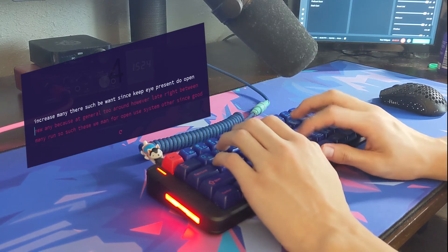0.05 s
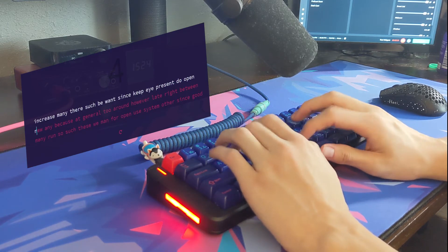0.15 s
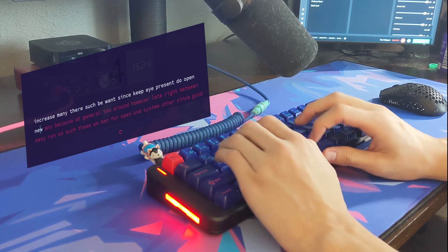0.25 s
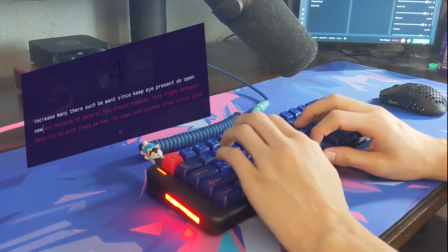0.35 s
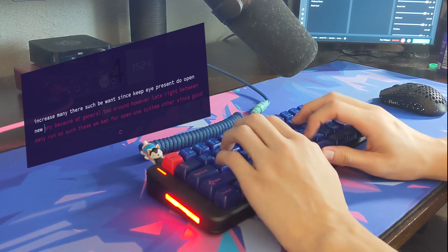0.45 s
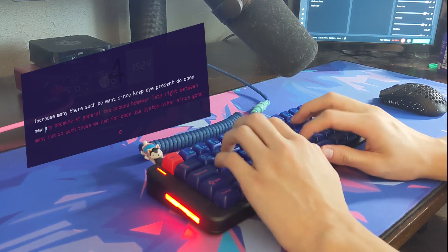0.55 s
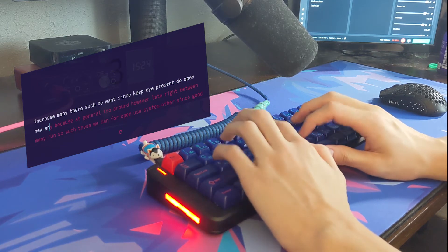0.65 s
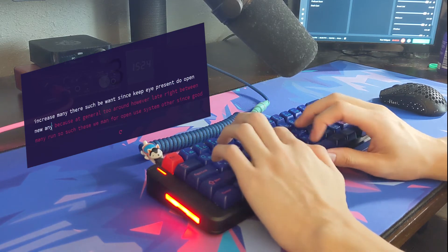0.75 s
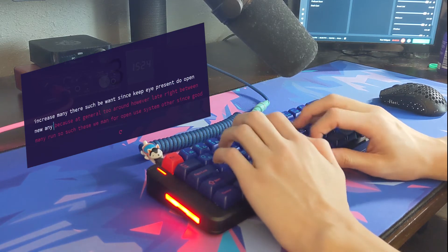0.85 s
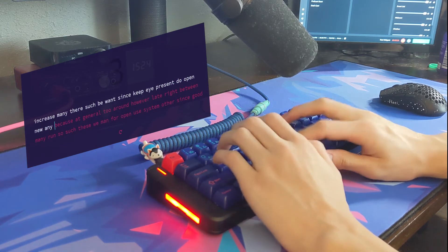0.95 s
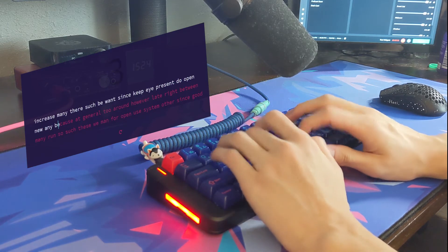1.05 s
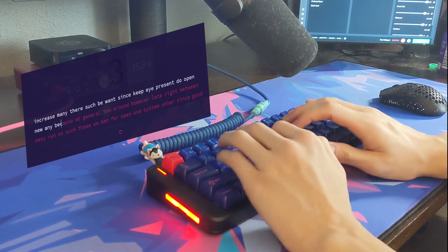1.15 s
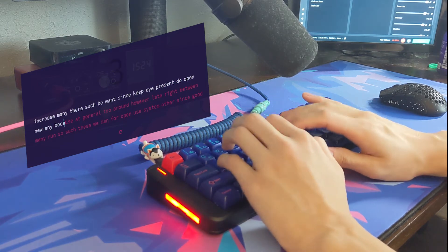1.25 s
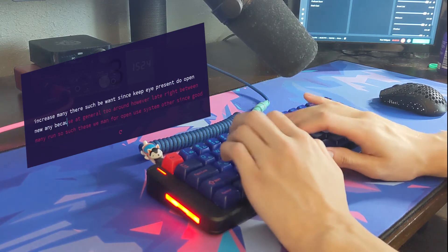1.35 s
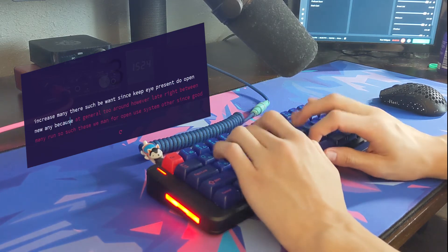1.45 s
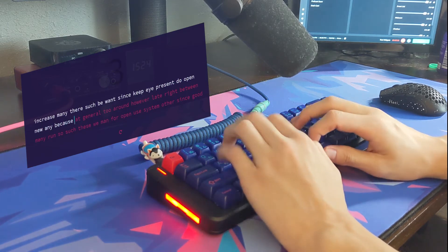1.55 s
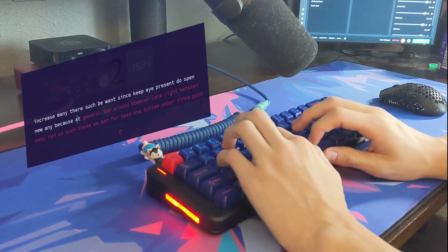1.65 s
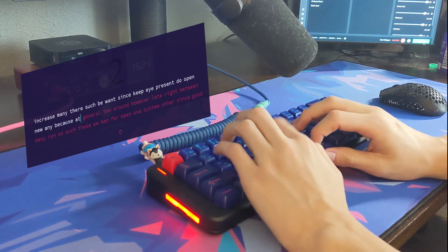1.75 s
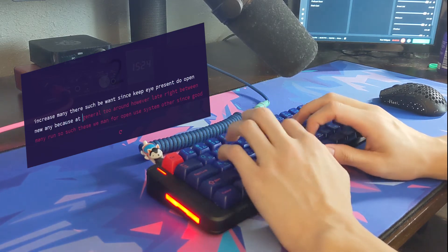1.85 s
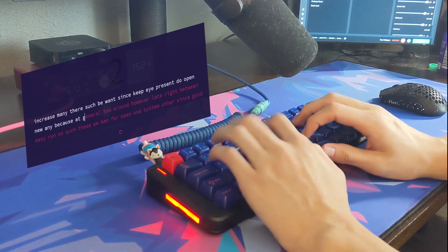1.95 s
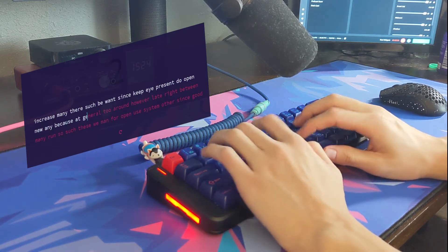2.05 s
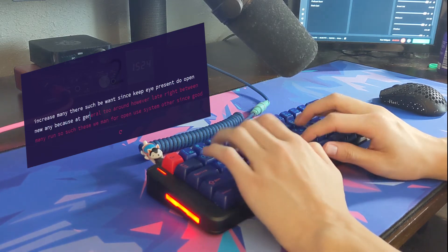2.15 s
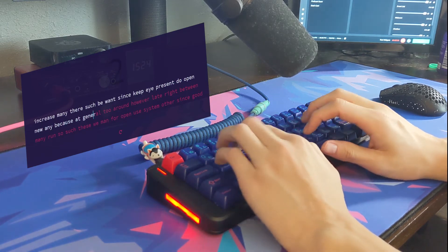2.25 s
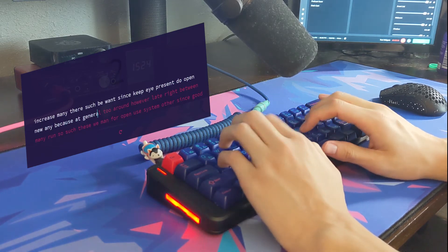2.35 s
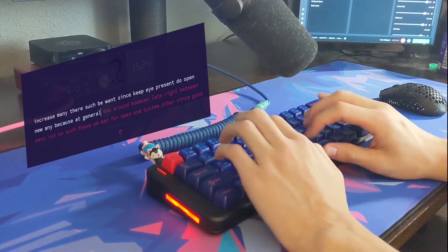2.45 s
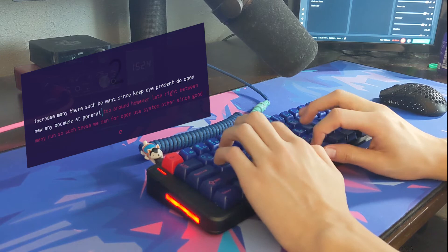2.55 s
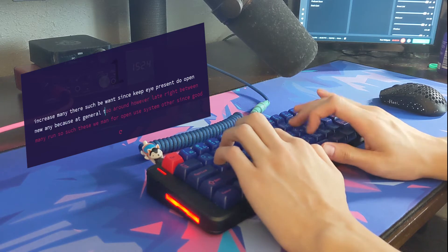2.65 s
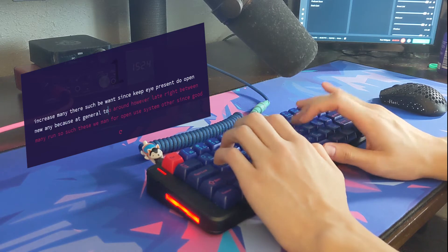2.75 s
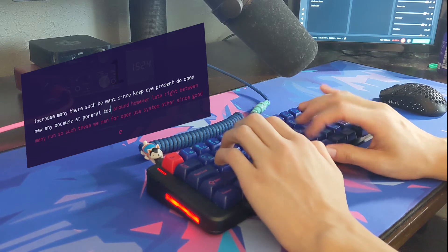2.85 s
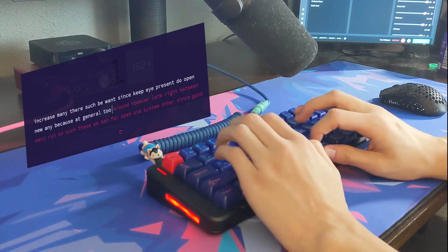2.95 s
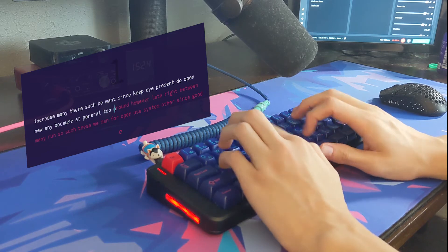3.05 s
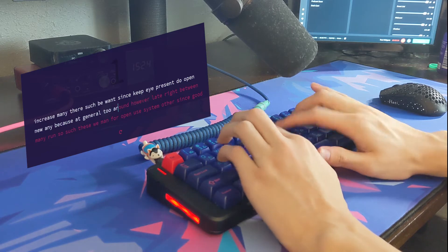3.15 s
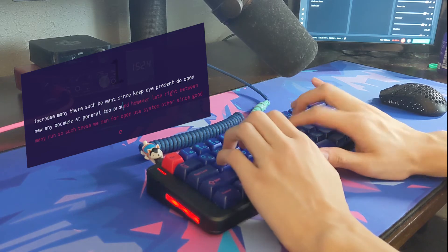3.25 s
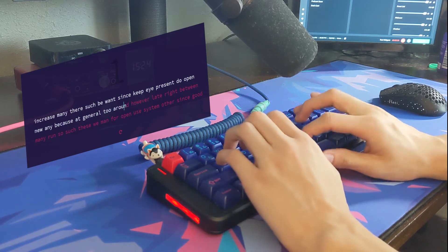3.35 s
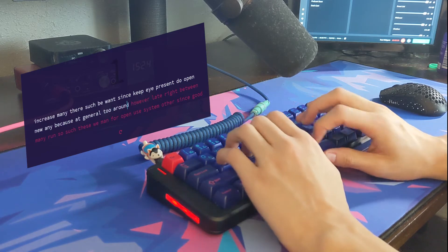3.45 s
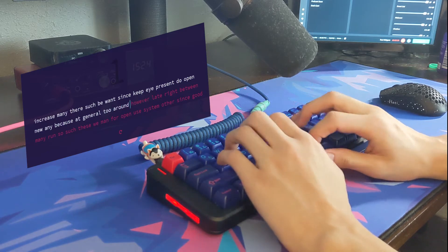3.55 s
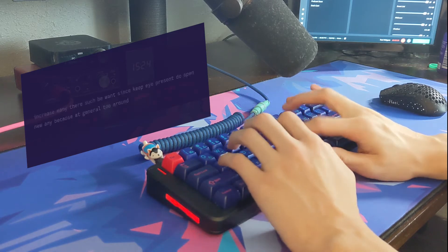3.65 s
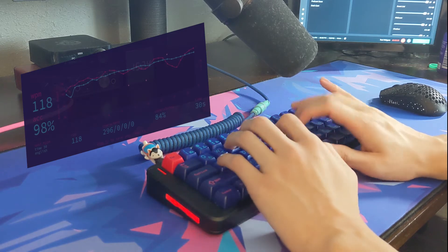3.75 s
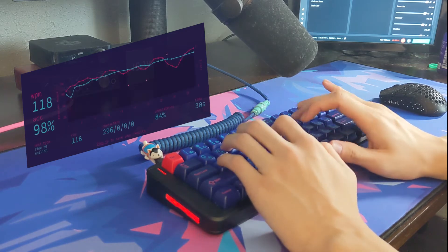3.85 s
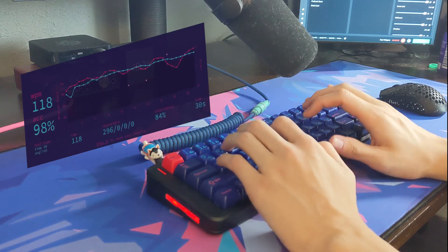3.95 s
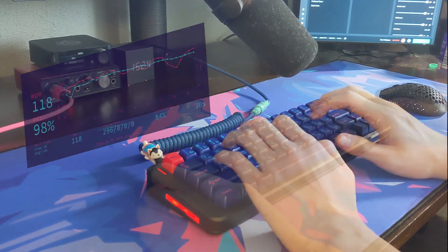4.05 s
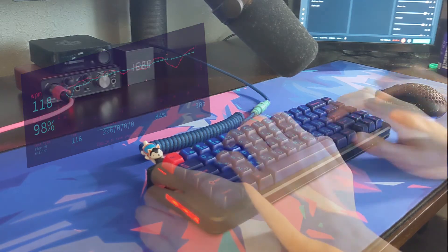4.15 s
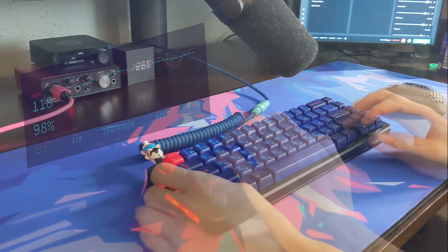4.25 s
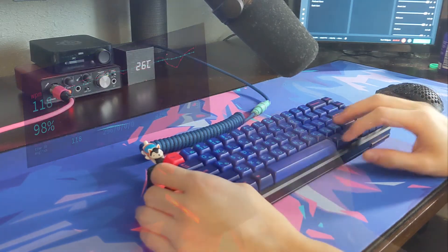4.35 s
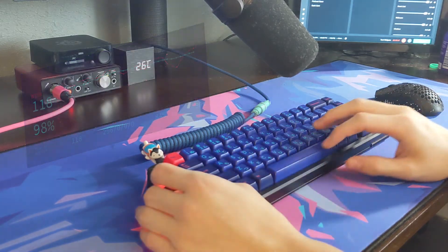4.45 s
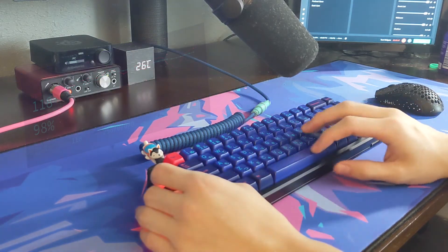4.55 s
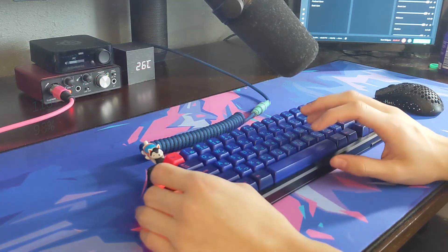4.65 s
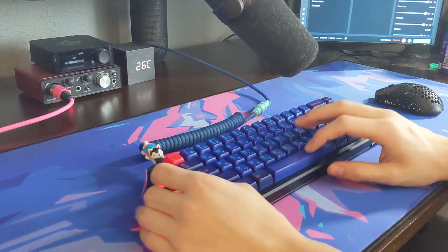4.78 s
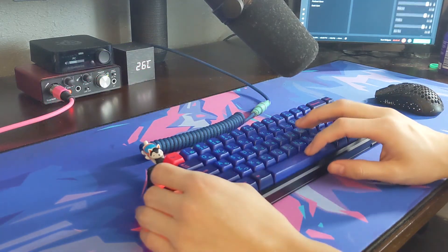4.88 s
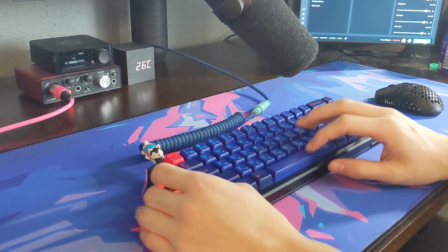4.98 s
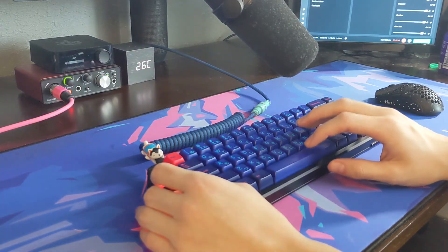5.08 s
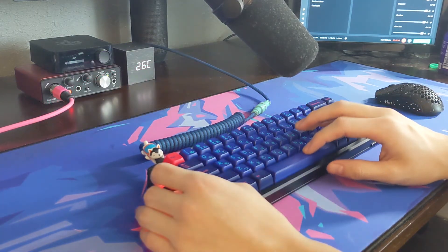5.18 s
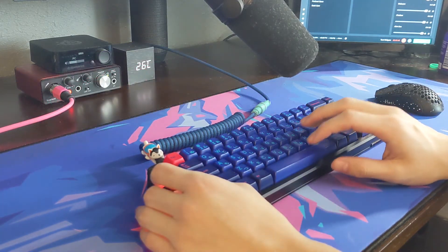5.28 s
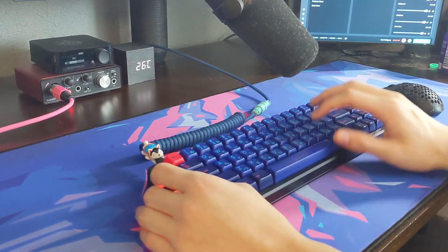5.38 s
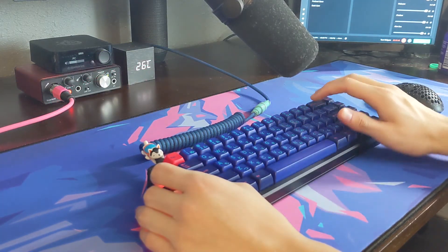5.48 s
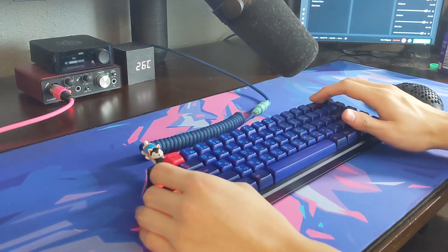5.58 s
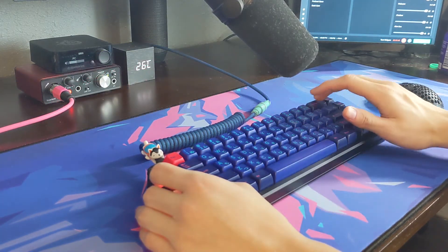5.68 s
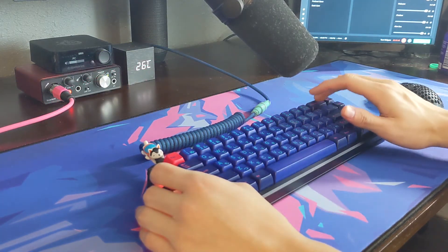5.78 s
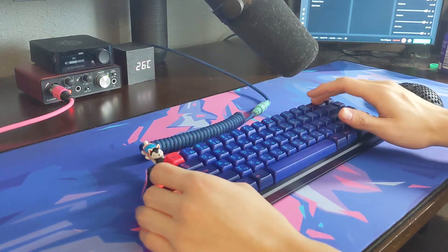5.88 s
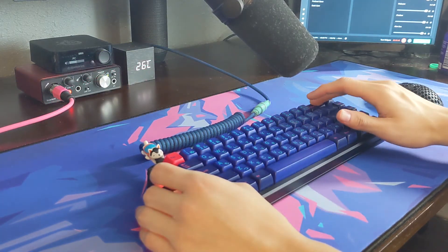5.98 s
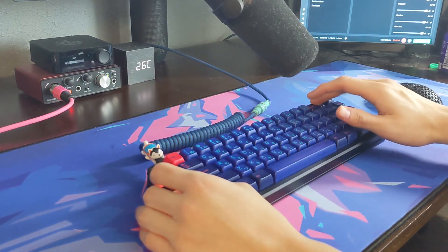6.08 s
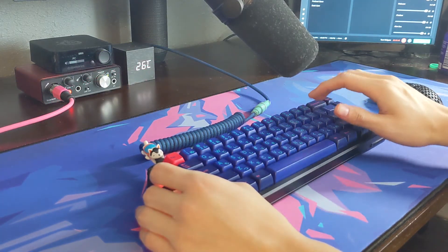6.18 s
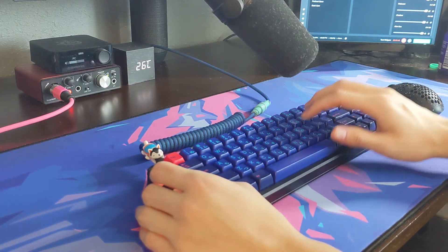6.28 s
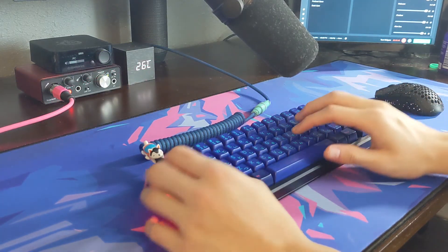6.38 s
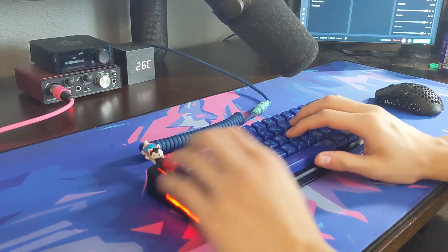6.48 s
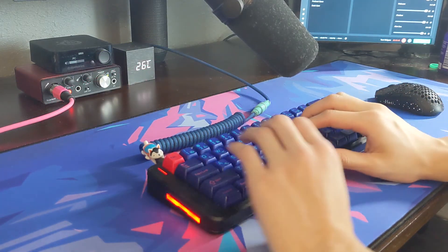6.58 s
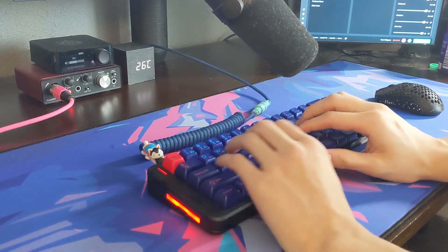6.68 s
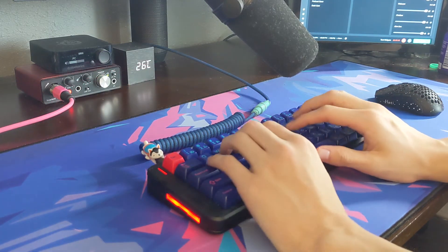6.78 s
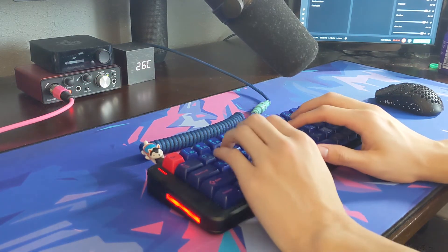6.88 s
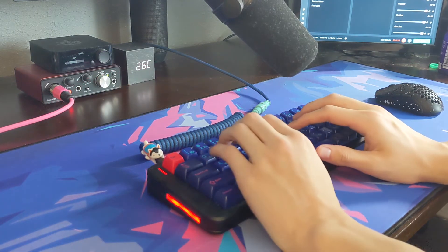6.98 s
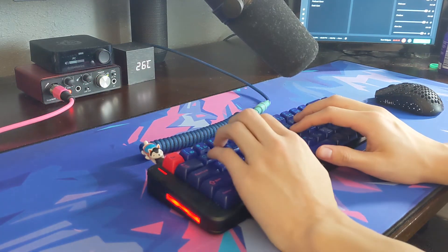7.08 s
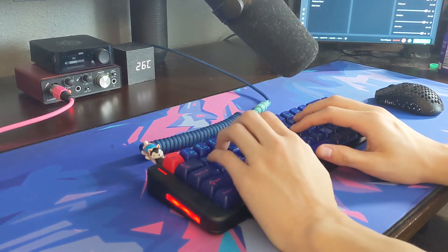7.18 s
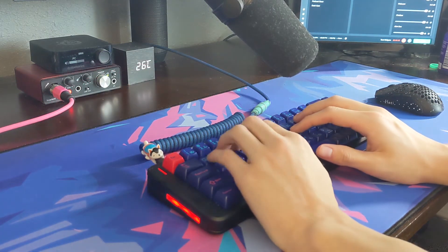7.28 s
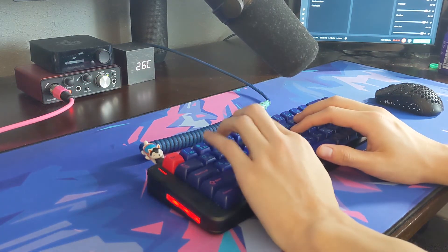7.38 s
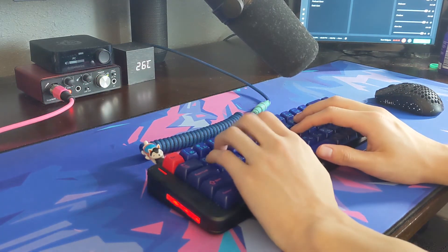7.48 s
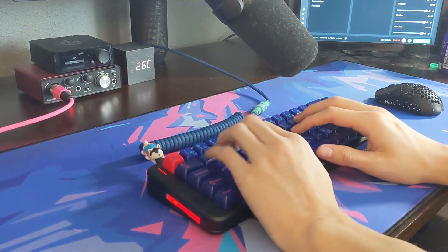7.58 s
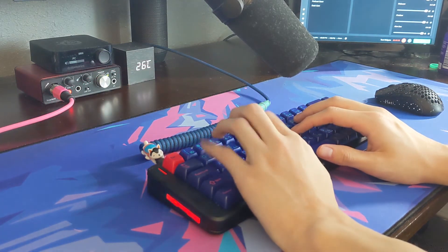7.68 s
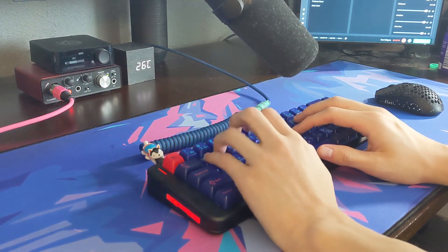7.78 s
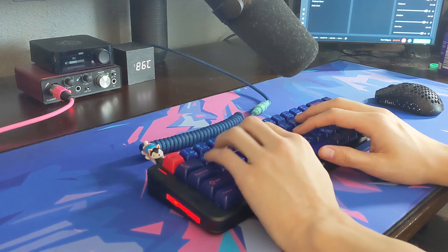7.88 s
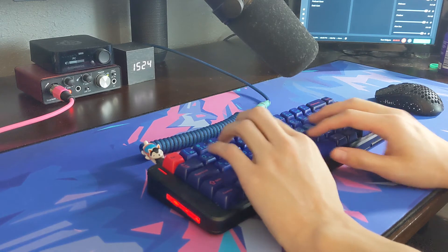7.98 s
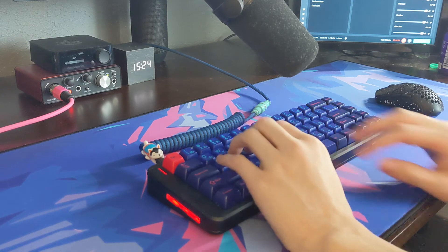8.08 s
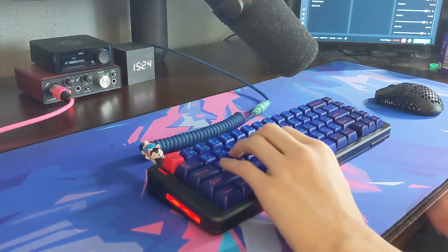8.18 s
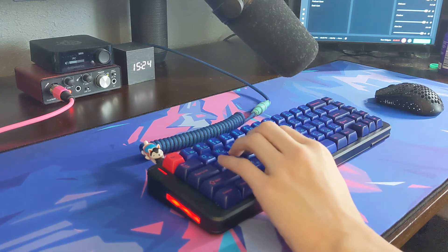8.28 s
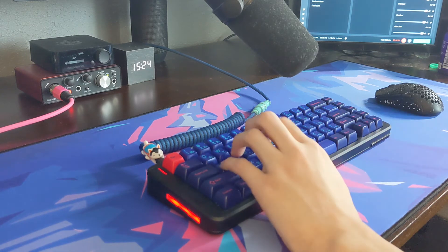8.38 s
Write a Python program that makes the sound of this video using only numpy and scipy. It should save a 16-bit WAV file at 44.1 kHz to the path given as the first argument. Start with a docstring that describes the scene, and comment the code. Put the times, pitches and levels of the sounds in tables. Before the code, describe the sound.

Close, crisp plastic key clacks and louder spacebar thocks run quickly, stop for a few single key tries, then resume softly in short bursts.

```python
"""Fast typing on a mechanical keyboard, close to a microphone on a desk arm, with spacebar blows among the letters;
then the spacebar and a wide side key are tried alone, and lighter typing follows. Each blow sums decaying modes of
cap or bar, plate, housing and case with filtered-noise ticks; the spacebar's stabiliser wire rattles. Low noise
shakes the desk, shaped noise slides the hands over the keys, and a small quiet room answers under faint still air."""
import sys
import numpy as np
from scipy import signal
from scipy.fft import rfft, irfft, next_fast_len
from scipy.io import wavfile
from scipy.ndimage import uniform_filter1d

SR = 44100
rng = np.random.default_rng(int(sys.argv[2]) if len(sys.argv) > 2 else 0)


def waveform_to_disk(signal):
    """Save audio, clipped to [-1, 1], as 16-bit WAV at the path in sys.argv[1]."""
    frames = np.transpose(np.atleast_2d(signal))
    scaled = np.clip(frames, -1, 1) * 32767
    samples = np.round(scaled).astype(np.int16)
    wavfile.write(sys.argv[1], SR, samples)


N = 371763

# letter keys bottoming out: (time [s], blow level [dB], cap pitch [Hz], relative housing snap [dB])
PRESSES = [(.0071, -31.5, 1950, -12), (0.0674, -37, 1930, -10), (0.547, -38.5, 1960, 1.5),
           (.812, -35.5, 1930, -5), (0.8542, -33, 2000, -15), (1.0514, -32.5, 1880, -12),
           (1.279, -30.5, 1950, -10.5), (1.4899, -32, 1920, -9.5), (1.7333, -34.5, 1880, -7),
           (1.8351, -21.5, 2070, -5.5), (2.0114, -28.5, 1980, -10.5), (2.0756, -31, 1960, -6.5),
           (2.1443, -31.5, 1890, -10.5), (2.22, -34, 1890, -3), (2.3013, -34.5, 2020, -13),
           (2.5109, -31, 2010, 2), (2.5705, -37.5, 2030, -3), (2.622, -32.5, 1740, 3),
           (2.6936, -37.5, 2080, -5), (2.9235, -32.5, 2010, -10), (2.9955, -37, 1970, -3),
           (3.0303, -35, 2050, -8.5), (3.0806, -40, 2050, -1.5), (3.1902, -31, 1750, -4),
           (3.5167, -27, 1820, -8.5), (3.5818, -33, 2010, -11.5), (3.6168, -29.5, 1870, 4.5),
           (3.6928, -38, 2030, -2.5), (7.068, -37.5, 2170, -17), (7.0977, -34, 2070, -12),
           (7.1457, -34.5, 2150, -9), (7.187, -37.5, 2080, -22), (7.3336, -39.5, 2280, -17),
           (7.3632, -35, 2090, -10.5), (7.6494, -37, 2230, -19), (7.698, -32, 2050, -9),
           (7.715, -37.5, 2140, -7), (8.2343, -36, 1830, -10), (8.3164, -32, 2020, -6),
           (8.3318, -33, 2070, -4.5)]
# light contacts, letter keys springing back and a few clicks of the spacebar's slack:
# (time [s], blow level [dB], relative housing snap [dB])
RETURNS_AND_CLICKS = [(0.1291, -33.5, -16), (0.158, -38, -1), (.372, -32, -25), (0.413, -42, -9),
                      (0.4675, -43.5, -22), (0.4791, -36.5, -27), (0.6388, -35, -17), (0.883, -38.5, -10),
                      (0.9368, -31.5, -21), (1.1394, -32, -11), (1.147, -39.5, -6), (1.221, -33, -15),
                      (1.225, -38.5, -12), (1.3458, -39, -22), (1.361, -36.5, -29), (1.7994, -33, -17),
                      (1.935, -30.5, -13), (1.94, -34.5, -10), (2.121, -41, -12.5), (2.1751, -35.5, -23),
                      (2.2509, -37.5, -19.5), (2.538, -31.5, -14), (2.8607, -38, -14.5),
                      (2.9733, -37.5, -19.5), (3.0154, -37.5, -24), (3.1153, -32.5, -14.5),
                      (3.2686, -34.5, -9.5), (4.7521, -40, -6), (7.1957, -34.5, -19), (7.2565, -39.5, -9),
                      (7.441, -38, -10), (7.455, -35, -16), (7.4613, -34, -41.5), (7.5015, -40.5, -13),
                      (7.7538, -33.5, -12), (7.768, -38.5, 1.5), (7.8146, -39.5, -20), (8.39, -38, -10),
                      (8.412, -44, -3), (8.427, -34, -16)]
# spacebar bottoming out: (time [s], blow level [dB])
SPACE_PRESSES = [(0.1742, -22.5), (0.6625, -18), (1.3276, -24), (1.5777, -21.5), (2.366, -18),
                 (2.7554, -22), (3.353, -16), (4.593, -17), (4.8729, -23.5), (5.0056, -24)]
# spacebar springing back: (time [s], blow level [dB])
SPACE_RETURNS = [(0.2598, -30.5), (.723, -26.5), (1.4416, -35), (1.655, -29.5), (2.443, -27.5),
                 (2.8428, -30), (3.4299, -25.5), (4.6397, -32.5), (4.7827, -30), (4.919, -29),
                 (5.0575, -31.5)]
# wide side key bottoming out: (time [s], blow level [dB])
SIDE_PRESSES = [(5.3841, -50), (5.5806, -35), (5.8304, -37), (5.943, -29)]
# wide side key springing back: (time [s], blow level [dB])
SIDE_RETURNS = [(5.5013, -48.5), (5.638, -50), (5.7638, -48.5), (5.887, -44.5), (6.017, -43)]
# modes of the case: (nominal frequency [Hz], relative level [dB], 60 dB decay time [s])
CASE = [(159.3, -13.5, 0.019), (250, -4.5, 0.018), (336, 1, 0.041), (411, 0.5, .036), (546, -2.5, 0.015)]
# modes of the plate: (nominal frequency [Hz], relative level [dB], 60 dB decay time [s])
PLATE = [(776.6, -4.5, 0.023), (925, -8, 0.012), (1219.4, 3, 0.016), (1272, 0, 0.019)]
# modes of a keycap: (nominal frequency [Hz], relative level [dB], 60 dB decay time [s])
CAP = [(1518, -3, 0.0081), (1770, 0.5, 0.016), (2096, 6.5, .012), (2406, -1, 0.012)]
# modes of a switch housing: (nominal frequency [Hz], relative level [dB], 60 dB decay time [s])
HOUSING = [(2630, -3.5, 0.0064), (3500, -3, .006), (3990, -4, 0.0078)]
# modes of the spacebar: (nominal frequency [Hz], relative level [dB], 60 dB decay time [s])
BAR = [(1491, -3, 0.02), (1908, 5, .0095), (2111, 0, 0.028)]
# modes of its stabiliser wire: (nominal frequency [Hz], relative level [dB], 60 dB decay time [s])
WIRE = [(5810, 6, .034), (6350, -2, 0.017), (6740, -1, .03), (10930, -1, 0.013), (11570, -1.5, 0.014),
        (12330, 3, .03)]
# colour of a hard plastic tick: (frequency [Hz], relative level [dB])
TICK = [(3500, -15), (5000, -3.5), (6000, -3.5), (9500, -5), (12000, 0), (14500, -15), (16000, -27.5)]

AGE = np.arange(16384) / SR  # time since a sound began, s
TICK_SLOPE = 0.4  # dB of tick per dB of housing snap


def undb(db):
    """Logarithmic level: decibels converted to amplitude gain."""
    return 10 ** (np.asarray(db) / 20)


def add(out, s, sound):
    """Superposition: mix a sound in at time s."""
    i = max(int(s * SR), 0)
    out[i:i + len(sound)] += sound[:max(N - i, 0)]


def colour(x, points):
    """Minimum-phase filtering: a folded cepstrum makes a causal filter through (Hz, dB) points."""
    hz, db = np.transpose(points)
    size = next_fast_len(2 * len(x), real=True) // 2 * 2
    bins_hz = np.arange(size // 2 + 1) * SR / size
    gain = undb(np.interp(np.log(bins_hz + 1), np.log(hz), db))
    cepstrum = irfft(np.log(gain))
    cepstrum[1:size // 2] *= 2
    cepstrum[size // 2 + 1:] = 0
    return irfft(rfft(x, size) * np.exp(rfft(cepstrum)))[:len(x)]


def noise(points):
    """Stationary random vibration: steady coloured noise of rms 1."""
    x = colour(rng.standard_normal(N), points)
    return x / x.std()


def band(x, lo_hz, hi_hz):
    """Radiation bandwidth: a two-pole slope at either end of the range a part radiates."""
    s = 2j * np.pi * np.arange(len(x) // 2 + 1) * SR / len(x)
    lo, hi = s / (2 * np.pi * lo_hz), s / (2 * np.pi * hi_hz)
    high_pass = lo ** 2 / (lo ** 2 + np.sqrt(2) * lo + 1)
    low_pass = 1 / (hi ** 2 + np.sqrt(2) * hi + 1)
    return irfft(rfft(x) * high_pass * low_pass)


def ring(modes, pitch=1, scatter_db=2.5, detune=0.0067, size=2048, dense_db=-9):
    """Modal superposition: decaying sines weighted anew by each blow, over a burst of modes too dense to tell apart."""
    hz, db, t60 = np.transpose(modes)[:, :, None]
    level_draw, pitch_draw = rng.standard_normal((2, len(modes), 1))
    t = AGE[:size]
    edges_hz = hz.min() * pitch * 0.74, hz.max() * pitch * 1.15
    sign = (-1) ** np.arange(len(modes))[:, None]  # neighbouring modes move in opposite directions
    amplitude = sign * undb(db + scatter_db * level_draw)
    fade = np.exp(-np.log(1000) * t / t60)
    sines = np.sin(2 * np.pi * hz * pitch * (1 + detune * pitch_draw) * t)
    clear = band((amplitude * fade * sines).sum(0), *edges_hz)
    burst = rng.standard_normal(size) * undb(-60 * t / min(t60.min(), .03))
    dense = band(band(burst, *edges_hz), *edges_hz)
    return clear / np.linalg.norm(clear) + undb(dense_db) * dense / np.linalg.norm(dense)


def rung(contacts, sound):
    """Linear excitation: the sound starts anew at each contact (s, size)."""
    y = np.zeros(len(sound) + 1024)
    for late, size in contacts:
        add(y, min(late, .022), size * sound)  # kept within the buffer
    return y


def level(sound, db):
    """Energy normalisation: give a short sound the energy of 10 ms with an rms of db."""
    return sound * undb(db) / np.sqrt(np.sum(sound ** 2) / (SR / 100))


def bounces(settle_ms, strength, count):
    """Inelastic rebound: a first contact and later ones of declining size until the part settles, rows (s, size)."""
    late = (np.arange(count) + 1 - rng.uniform(0, .5, count)) / count * settle_ms / 1000
    sizes = strength * rng.uniform(0.94, 1.0, count) * np.linspace(1, .6, count)
    return [(.0005, 0.67)] + list(zip(late, sizes))


def strike(contacts, parts):
    """Coupled excitation: each part (sound, dB) is rung by all the contacts of one blow."""
    return sum(level(rung(contacts, sound), db) for sound, db in parts)


def tick(contacts, t60, tail_db, tail_t60):
    """Broadband impact: noise cracks at each contact, a faint sizzle follows, and powers add incoherently."""
    t = AGE[:2048]
    fade = undb(-60 * t / t60) + undb(tail_db - 60 * t / tail_t60)
    power = rung([(s, size ** 2) for s, size in contacts], fade ** 2)
    return colour(rng.standard_normal(len(t)) * np.sqrt(power[:len(t)]), TICK)


def rising_noise(s, db, length=0.012):
    """Rising noise: faint grainy noise swells until the blow at time s, (start s, sound)."""
    t = AGE[:int(length * SR)]
    grains = rng.standard_normal(len(t)) * undb(4 * rng.exponential(size=len(t)))
    return s - length, level(colour(grains * np.sqrt(t / length), TICK), db)


def still_air():
    """Stationary background: steady coloured noise of constant level."""
    # colour of the still air: (frequency [Hz], relative level [dB])
    air_colour = [(71, -45.5), (120, -14), (278, -6.5), (327, -16), (513, -15.5), (605, -18.5),
                  (930, -20.5), (1010, -21), (5520, -42.5), (16000, -41.5)]
    return undb(-64) * noise(air_colour)


def desk(push_db=-43, side_push_db=-43, rest_db=-54, settle_s=.1):
    """Damped forced vibration: each listed contact adds power to the desk's rumble, which climbs the arm and decays."""
    # colour of the desk's slow shaking: (frequency [Hz], relative level [dB])
    rumble_colour = [(12, -2), (27, -3), (47, -5), (65, -20.5), (95, -26), (150, -28.5), (260, -70)]
    usual_contacts = PRESSES + RETURNS_AND_CLICKS + SPACE_PRESSES + SPACE_RETURNS
    side_key_contacts = SIDE_PRESSES + SIDE_RETURNS
    pushes = np.zeros(N)
    for rows, db in (usual_contacts, push_db), (side_key_contacts, side_push_db):
        for s, *_ in rows:
            add(pushes, s, np.array([undb(db) ** 2]))
    power = signal.lfilter([1], [1, -np.exp(-1 / (settle_s * SR))], pushes)
    power = uniform_filter1d(power, size=3000)  # the finger leans on the key before it lands
    return noise(rumble_colour) * np.sqrt(power + undb(rest_db) ** 2)


def clack(db, hz, snap_db, contacts):
    """Impact on coupled resonators: one blow rings stem, cap, plate, switch housing and case."""
    # the stem's blunt impact, over in a few cycles:
    # (nominal frequency [Hz], relative level [dB], 60 dB decay time [s])
    stem_knock = [(1670, 0, 0.0033)]
    pitch = hz / 2010  # re the usual cap pitch, Hz
    plate_db = -41 + 0.48 * (db + 34)  # rises less steeply than the blow
    return strike(contacts, [
        (ring(stem_knock, pitch, detune=.06, dense_db=-15), db - 11),
        (ring(CAP, pitch, scatter_db=4.5, detune=0.028, dense_db=-7.5), db - 0.5),
        (ring(PLATE, scatter_db=5.5, detune=0.06, dense_db=-14), plate_db),
        (ring(HOUSING, scatter_db=0.5, detune=.05, dense_db=-4.5), db + snap_db - 4.0),
        (ring(CASE, detune=0.051), db - 20.5)])


def letter_presses():
    """Impact under constraint: the finger pins the landing key, so its contacts are few, tight and quickly over."""
    out = np.zeros(N)
    for s, db, hz, snap_db in PRESSES:
        contacts = bounces(settle_ms=1.7, strength=.18, count=2)
        tick_db = db - 13.5 + TICK_SLOPE * snap_db
        add(out, s, clack(db, hz, snap_db, contacts))
        add(out, s, level(tick(contacts, .003, -14, .022), tick_db))
        add(out, *rising_noise(s, tick_db - 21))
        # the fingertip meets the cap a moment before the key lands
        touch_s = s - rng.uniform(.008, 0.03)
        touch = tick([(.003, 1)], .004, -10, .016)
        add(out, touch_s, level(touch, -67 + 4 * rng.standard_normal()))
    return out


def returns_and_clicks():
    """Free rebound: letter keys springing back, and a few slack clicks, chatter longer than presses, each differently."""
    out = np.zeros(N)
    free_hz = 2015  # pitch of a cap with no finger on it
    for s, db, snap_db in RETURNS_AND_CLICKS:
        settle_ms = 4.6 * np.exp(.35 * rng.standard_normal())
        contacts = bounces(settle_ms, strength=0.42, count=2)
        tick_db = db - 13 + TICK_SLOPE * snap_db
        add(out, s, clack(db, free_hz, snap_db, contacts))
        add(out, s, level(tick(contacts, 0.0038, -24, .025), tick_db))
        add(out, *rising_noise(s, tick_db - 19))
    return out


def sideways(x, spread_hz=170):
    """Directional radiation: caps send other modes sideways; random modulation spreads the treble over nearby Hz."""
    treble = signal.sosfiltfilt(signal.butter(2, 800, "high", fs=SR, output="sos"), x)
    flutter = signal.sosfilt(signal.butter(4, spread_hz, fs=SR, output="sos"), rng.standard_normal(N))
    return x - treble + treble * np.tanh(2 * flutter / flutter.std()) * 1.37


def reflections(x, db, t60):
    """Diffuse reverberation: convolution with a dense, fading train of echoes."""
    # colour of the room's answer: (frequency [Hz], relative level [dB])
    room_colour = [(100, -10.5), (350, 2), (1250, 1.5), (2100, -5.5), (4000, -3.5), (6000, -3),
                   (15000, -8.5)]
    onset = np.clip(AGE / .003 - 1, 0, 1)  # silent for 3 ms, full at 6 ms
    tail = rng.standard_normal(len(AGE)) * undb(-60 * AGE / t60) * onset
    return signal.fftconvolve(x, colour(undb(db) * tail / np.linalg.norm(tail), room_colour))[:N]


def room(x):
    """Early and late reflection: a quick answer from desk and screen, then a fainter, slower fade from the walls."""
    return reflections(x, db=-13.5, t60=0.056) + reflections(sideways(x), db=-18, t60=.35)


def spacebar_slack():
    """Impact across a clearance: the thumb takes up the wire's slack, which rattles, usually before the bar lands."""
    # the wire's slack taken up: (time [s], blow level [dB])
    slack_times = [(.151, -48), (0.65, -33.5), (1.303, -45.5), (1.5521, -39.5), (2.3493, -36),
                   (2.7391, -35), (3.3418, -41), (4.5833, -36.5), (4.7305, -39.5), (4.858, -42.5),
                   (4.9913, -42)]
    out = np.zeros(N)
    for s, db in slack_times:
        contacts = bounces(settle_ms=7.5, strength=.55, count=3)
        add(out, s, level(tick(contacts, 0.006, -16.0, .03), db - 0.5))
        add(out, s, strike(contacts, [
            (ring(WIRE, scatter_db=8, detune=.015), db - 6),
            (ring(BAR), db - 4),
            (ring(PLATE), db - 7.5),
            (ring(HOUSING), db - 10),
            (ring(CASE), db - 12.5)]))
    return out


def spacebar_presses():
    """Single impact on a resonant bar: the long hollow bar lands with one clean knock while wire and housing chatter."""
    out = np.zeros(N)
    for s, db in SPACE_PRESSES:
        add(out, s, strike([(0, 1)], [
            (ring(BAR, detune=.008, dense_db=-17), db + .5),
            (ring(CASE, detune=0.11, dense_db=-6.5), db - 15),
            (ring(PLATE), db - 16.5),
            (ring(WIRE, scatter_db=1.5, detune=0.014), db - 20.5)]))
        chatter = bounces(9.8, 1.0, count=3)  # the wire keeps shaking after the knock
        add(out, s, strike(chatter, [(ring(HOUSING, detune=0.097), db - 19)]))
        add(out, s, level(tick(chatter, 0.0095, -9.0, .06), db - 25.5))
    return out


def spacebar_returns():
    """Repeated rebound: the rising bar rattles on bar, plate, housing and wire, over one knock of the case."""
    out = np.zeros(N)
    for s, db in SPACE_RETURNS:
        contacts = bounces(16, 0.41, count=4)
        add(out, s, strike(contacts, [
            (ring(BAR[:-1], detune=0.027), db - .6),
            (ring(BAR[-1:], detune=.003, dense_db=-14), db - 2),  # the longest mode, on its own
            (ring(PLATE), db - 7.0),
            (ring(HOUSING, detune=0.02), db - 14.0),
            (ring(WIRE, scatter_db=1.5, detune=0.01, dense_db=-7), db - 12.5)]))
        add(out, s, level(tick(contacts, .007, -7, 0.081), db - 13))
        add(out, s, level(ring(CASE, detune=0.07, dense_db=-10), db - 5.5))
    return out


def light_key_contacts():
    """Weak impact: lightly moved caps ring dully, some clearly and others faintly just after the listed returns."""
    # light key contacts, fingertips nudging caps and some keys springing back: (time [s], blow level [dB])
    listed = [(0.992, -47.5), (1.085, -42), (1.416, -48), (1.435, -34.5), (2.038, -39), (3.127, -40),
              (5.457, -55), (5.624, -54), (5.694, -43.5), (5.714, -46), (5.814, -49), (5.987, -46),
              (6.397, -57.5), (6.568, -53), (6.679, -54), (6.711, -55.5), (7.002, -37), (7.173, -33),
              (7.292, -49), (7.306, -39.5), (7.393, -46), (7.563, -50), (7.586, -43), (8.042, -58.5),
              (8.095, -59), (8.186, -58)]
    out = np.zeros(N)
    faint = []
    for s, *_ in RETURNS_AND_CLICKS:  # faint brushes against neighbouring caps
        faint.append((s + rng.uniform(0, .07), -58 + 3.5 * rng.uniform(-1, 1)))
    for s, db in listed + faint:
        contacts = bounces(5.1, .37, count=2)
        add(out, s, strike(contacts, [
            (ring(CAP, detune=0.036, dense_db=-1), db - 7.5),
            (ring(PLATE, detune=0.024), db - 8.5),
            (ring(HOUSING, detune=0.05, dense_db=-4), db - 15.5)]))
        tick_db = 0.63 * db - 38  # light contacts are relatively brighter
        add(out, s, level(tick(contacts, .0055, -22.5, 0.023), tick_db))
    return out


def hands():
    """Sliding friction: skin brushes over caps and mat as noise that swells and fades, each slide with its own treble."""
    # colour of rubbing skin: (frequency [Hz], relative level [dB])
    skin_colour = [(1000, -2), (2500, 2.5), (4000, 1), (5000, -3), (8000, -0.5), (12000, -6.5),
                   (15000, -23.5)]
    # hands sliding to a new position: (middle [s], width scale [s], peak level before treble gain [dB],
    # treble gain [dB])
    slides = [(4.031, 0.29, -65, 2.5), (4.308, 0.085, -65.5, -4), (6.43, 0.14, -67, -9),
              (6.56, 0.12, -68, -17), (6.745, 0.1, -69, -1.5), (7.87, 0.23, -59.5, -1.5)]
    t = np.arange(N) / SR
    rub = noise(skin_colour)
    treble = signal.sosfilt(signal.butter(1, 5000, "high", fs=SR, output="sos"), rub)
    out = np.zeros(N)
    for s, width, db, treble_db in slides:
        swell = undb(db) / (1 + ((t - s) / width) ** 2) ** 4
        out += (rub + treble * (undb(treble_db) - 1)) * swell
    return out


def springs(count):
    """Beating of near-unison resonators: several switch springs ring slightly out of tune with each other."""
    # modes of a switch spring: (nominal frequency [Hz], relative level [dB], 60 dB decay time [s])
    spring_modes = [(4240, 0, 0.15), (4440, -4, 0.22), (7650, -13, .18), (11340, -16, .15)]
    return ring(spring_modes * count, scatter_db=4.0, detune=0.0059, size=8192, dense_db=-12)


def side_strokes(rows, settle_ms, bounce, plate_db, housing_db, tick_db):
    """Impact and sympathetic ringing: blows of the wide side key, with part levels relative to the blow."""
    # modes of the case under the side key: (nominal frequency [Hz], relative level [dB], 60 dB decay time [s])
    side_case = [(393.5, -2, 0.035), (1194, -3.5, 0.05)]
    out = np.zeros(N)
    for s, db in rows:
        contacts = bounces(settle_ms, bounce, count=3)
        add(out, s, strike(contacts, [
            (ring(CAP, pitch=0.918, detune=0.051, dense_db=0), db + .5),
            (ring(PLATE), db + plate_db - 4),
            (ring(HOUSING, detune=.069, dense_db=-14), db + housing_db)]))
        add(out, s, level(ring(side_case, dense_db=-15.5), db + plate_db - 2.0))
        own_spring = ring([(4350, 0, 0.028)], dense_db=-1.5)  # damped by the finger
        add(out, s, level(own_spring, .5 * db - 29.5))
        # the springs' ping grows with time since the first press
        built_up = 1 - np.exp(-(s - SIDE_PRESSES[0][0]) / .25)
        add(out, s, built_up * level(springs(count=8), -55))
        add(out, s, level(tick(contacts, 0.0066, -26, 0.11), db + tick_db))
        add(out, *rising_noise(s, db - 27))
    return out


def side_key():
    """Unequal impact and rebound: the wide key knocks going down, chatters on the plate coming up; springs shimmer."""
    presses = side_strokes(SIDE_PRESSES, settle_ms=2.7, bounce=0.12, plate_db=-8, housing_db=-16.5, tick_db=-15.5)
    returns = side_strokes(SIDE_RETURNS, settle_ms=6.1, bounce=0.47, plate_db=1.5, housing_db=-3.0, tick_db=-4.5)
    return presses + returns


def scene():
    """Superposition of sources: keyboard, its room, desk, hands and still air."""
    typing = letter_presses() + returns_and_clicks() + light_key_contacts()
    spacebar = spacebar_slack() + spacebar_presses() + spacebar_returns()
    keyboard = typing + spacebar + side_key()
    return (still_air() + desk() + keyboard + room(keyboard) + hands())[None]


def record(dry):
    """Band limiting: a clean microphone with everything above 16.2 kHz steeply cut."""
    return signal.sosfilt(signal.ellip(8, .2, 70, 16200, fs=SR, output="sos"), dry)


dry = scene()
out = record(dry)
waveform_to_disk(out)
```